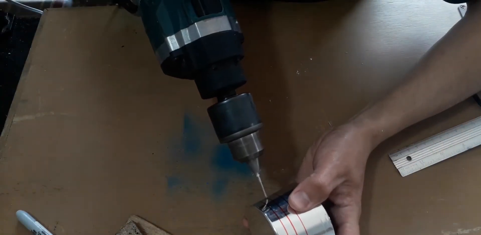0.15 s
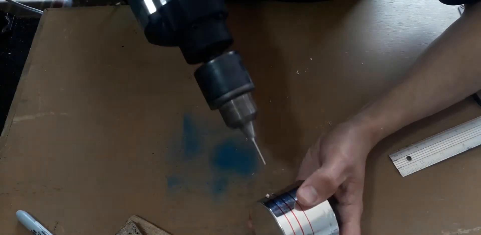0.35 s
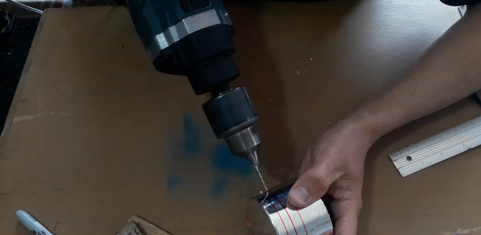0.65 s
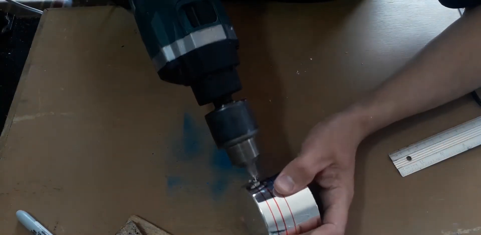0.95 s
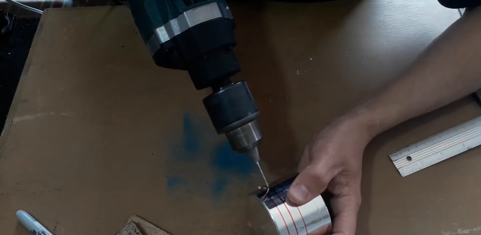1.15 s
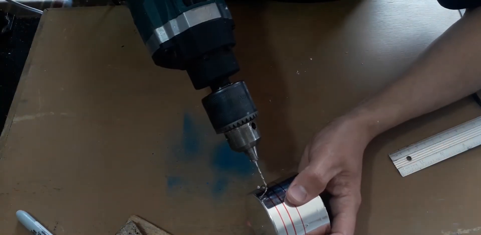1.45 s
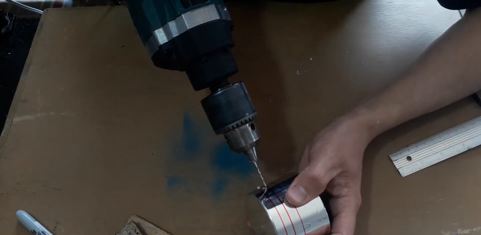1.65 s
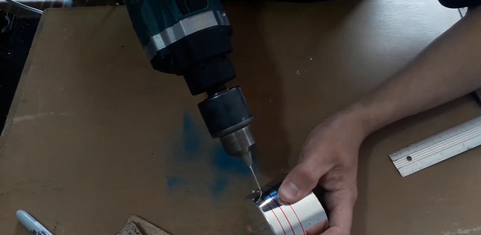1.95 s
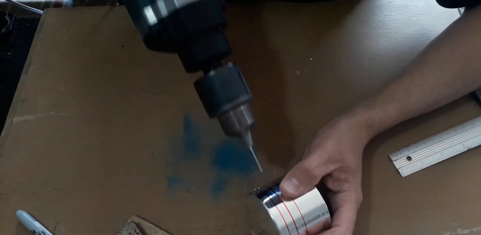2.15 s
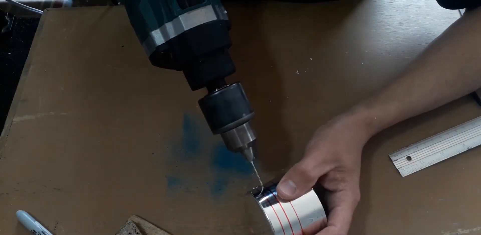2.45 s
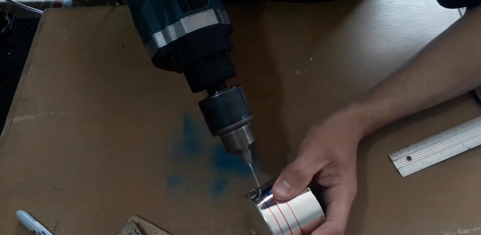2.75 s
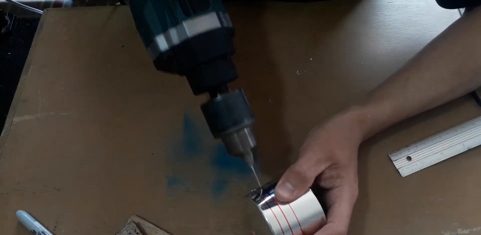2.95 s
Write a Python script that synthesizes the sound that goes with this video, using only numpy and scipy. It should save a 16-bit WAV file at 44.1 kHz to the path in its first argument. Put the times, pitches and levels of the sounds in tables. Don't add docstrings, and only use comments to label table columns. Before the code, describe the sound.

A handheld electric drill, close in a small quiet room, starts already running and winds down from 0.3 to about 0.75 seconds. Short pulls at 0.8 and 1.9 whine up fast with a rough squeal, then coast down for half a second, with faint plastic buzzing near release. Soft clicks at 1.45 and 1.8 and faint rubs fill the pause. A longer, higher burst starts at 2.6 and runs to the end.

```python
import sys
import numpy as np
from scipy import signal
from scipy.fft import rfft, irfft, next_fast_len
from scipy.io import wavfile
from scipy.ndimage import uniform_filter1d, map_coordinates

SR = 44100
rng = np.random.default_rng(int(sys.argv[2]) if len(sys.argv) > 2 else 0)


def to_wav(sig):
    pcm = np.clip(np.atleast_2d(sig), -1, 1) * 32767
    pcm = np.round(pcm).astype(np.int16)
    wavfile.write(sys.argv[1], SR, pcm.T)


def undo_db(level):
    steps = np.asarray(level, float) / 20
    return 10 ** steps


N = 136710

# (press [s], release [s], top gear mesh rate [Hz], spin-up time [s])
BURSTS = [
    (-.110, 0.297, 1646, .130),
    (0.825, .978, 1703, .066),
    (1.926, 2.108, 1939, .069),
    (2.612, 3.003, 2076, 0.096),
]
# (time [s], level [dB])
EFFORT = [
    [(0.0, -33.5), (0.224, -28.5), (0.3, -28.5), (0.334, -32), (0.61, -41.5), (0.706, -50), (0.736, -61),
     (0.794, -106.5), (0.8, -71.5)],
    [(0.801, -62), (0.811, -36), (0.839, -32), (0.893, -28.5), (0.975, -25.5), (1.009, -31.5), (1.345, -44),
     (1.453, -67.5), (1.47, -105)],
    [(1.921, -57), (1.929, -34), (1.951, -30.5), (1.985, -28.5), (2.097, -25.5), (2.137, -30.5),
     (2.443, -39), (2.571, -51.5), (2.615, -62)],
    [(2.616, -55), (2.628, -34), (2.656, -30.5), (2.802, -27), (2.95, -27), (2.96, -25), (3.1, -31.5)],
]
# (frequency [Hz], level [dB])
FAST_HISS = [(59, -87.5), (100, -45.5), (185, -27.5), (1030, -18), (1300, -10.5), (1540, -15), (3920, -0.5),
             (12100, -4), (15900, 0)]
# (frequency [Hz], level [dB])
SLOW_HISS = [(59, -68.5), (100, -54.5), (988, -17.5), (1360, -18), (1910, -6.5), (2620, -5.5), (3240, -12),
             (9760, -2), (15900, -8)]
# (frequency [Hz], level [dB])
START_HISS = [(59, -77), (100, -46.5), (581, -18), (1030, -32.5), (1220, -14), (3040, 1), (4650, -19),
              (10200, -10.5), (15900, -17.5)]
# (frequency [Hz], width [Hz], level [dB])
SHELL = [(1320, 90, -3), (2610, 160, -1), (5850, 200, -3), (6840, 200, -1), (9500, 300, -1),
         (11400, 200, -1), (12000, 150, -3), (13000, 200, -3), (13700, 200, -1)]
ORDERS = [.104, .2, .68, 1, 1.5, 2, 2.55, 3, 4, 4.55, 5, 5.1, 6, 6.55, 7.05, 7.62, 8]
# (level [dB], growth exponent with speed)
WHINE = [(-29, 3.2), (-36, 2.5), (-30.5, 2), (-3, 3.3), (-23.5, 2.8), (-8.5, 2.2), (-8, 0.19), (-8, 1.8),
         (-7, 2.2), (-13.5, 1.7), (-16.5, 1.1), (-10, 1.8), (-27, 1.5), (-18.5, .9), (-10, 0.65),
         (-5.5, 2.1), (-1, 1.1)]
# (frequency [Hz], width [Hz], level [dB])
HOUSING = [(1500, 140, 0), (1958, 53, 7), (2367, 320, 12), (2980, 67, 8.5), (4057, 250, 5),
           (5260, 1500, 0.5)]
SQUEAL_DB = [-23, -18.5, -18, -19.5]
# (time [s], level [dB])
CATCHES = [(.005, -29), (.23, -34), (0.326, -50), (.922, -33), (0.946, -31.5), (0.966, -53), (0.989, -32.5),
           (1.03, -54), (2.046, -29), (2.065, -46), (2.115, -34), (2.269, -51), (2.97, -59)]
# (time [s], length [s], frequency [Hz])
CHATTER = [
    (1.003, .016, 490),
    (2.088, .028, 500),
    (2.05, .016, 600),
]
CHATTER_DB = [-40.5, -47, -46]
# (time [s], peak [dB], rattle [dB])
CLICKS = [
    (1.4476, -45, -33),
    (1.8045, -35, -16),
]
# (frequency [Hz], level [dB], T60 [s])
SWITCH = [(1353, -7, 0.057), (2516, -13, 0.039), (3400, -17.5, .03), (9700, -15, 0.026),
          (11900, -21, 0.026), (13420, -30, 0.025)]
# (time [s], length [s], frequency [Hz], level [dB])
RUBS = [(1.507, 0.046, 3400, -65.5), (1.568, 0.024, 2340, -67), (1.605, .05, 1840, -67),
        (1.624, 0.045, 2690, -68), (1.68, .04, 2400, -76), (1.869, .06, 2550, -70),
        (1.891, 0.017, 3400, -64), (0.735, 0.041, 1360, -60.5)]
# (frequency [Hz], level [dB])
FLOOR = [(40, -16.5), (200, -6.5), (400, -5.5), (600, 5.5), (900, -1), (2600, -7), (5500, -23.5),
         (12000, -28.5), (15900, -54.5)]

COAST_S, FRICTION_HZ = 0.47, 1202.5
FAST_DB, SLOW_DB, START_DB = 5, 3, -7
MIX_HZ, LOAD_S = 1094, 0.088
GRIT_DB, PATCH_DB = 2, 1.58
WHINE_DB, FLUTTER_DB, FLUTTER_RATE_HZ, SMEAR = -31, 2.2, 50, .0008
MESH_HZ = 780
SQUEAL_ORDER, SQUEAL_AT_HZ, SQUEAL_SPAN_HZ = 11.3, 1024, 102
SQUEAL_WIDTH, SQUEAL_BEAT_HZ = .05, 572
CATCH_S = 0.00046
RUB_WIDTH_HZ, RUB_SCRAPE_DB = 68, -4
ROOM_T60_S, ROOM_DB = 0.17, -7.5
FLOOR_DB, SIDE_DB = -67.5, -28.5
LOW_HZ, TOP_HZ = 192, 15850


def unit(x):
    return x / np.sqrt(np.mean(x ** 2) + 1e-20)


def filtered(x, response):
    m = next_fast_len(N + SR // 2)
    return irfft(rfft(x, m) * response(np.fft.rfftfreq(m, 1 / SR)), m)[..., :N]


def noise(points):
    f, db = np.transpose(points)
    colour = lambda hz: undo_db(np.interp(np.log(hz + 1), np.log(f + 1), db))
    return unit(filtered(rng.standard_normal(N), colour))


def wobble(rate_hz):
    return map_coordinates(rng.standard_normal(SR), [np.arange(N) * rate_hz / SR])


def peak(f, hz, width_hz):
    return 1j * f * width_hz / (hz * hz - f * f + 1j * f * width_hz)


def resonant(x, modes):
    return filtered(x, lambda f: 1 + sum(undo_db(db) * peak(f, hz, width) for hz, width, db in modes))


def motor(t):
    rows = []
    for press, release, top_hz, climb_s in BURSTS:
        powered_s = np.clip(np.minimum(t, release) - press, 0, None)
        up = top_hz * (1 - np.exp(-powered_s / climb_s))
        drag = np.exp(-np.clip(t - release, 0, None) / COAST_S)
        rows.append(np.maximum((up + FRICTION_HZ) * drag - FRICTION_HZ, 0))
    load = 0
    for effort in EFFORT[1:]:
        start = effort[0][0]
        load = load + np.exp(-np.clip(t - start, 0, None) / LOAD_S) * (t >= start)
    return np.array(rows), np.clip(load, 0, 1)


def hiss(speed, load, t):
    gain = sum(undo_db(np.interp(t, *np.transpose(row), left=-150, right=-150)) for row in EFFORT)
    fast = speed ** 2 / (speed ** 2 + MIX_HZ ** 2)
    x = np.sqrt((1 - load) * fast) * undo_db(FAST_DB) * noise(FAST_HISS)
    x = x + np.sqrt((1 - load) * (1 - fast)) * undo_db(SLOW_DB) * noise(SLOW_HISS)
    x = x + np.sqrt(load) * undo_db(START_DB) * noise(START_HISS)
    z = signal.stft(x, nperseg=256)[2]
    field = uniform_filter1d(uniform_filter1d(rng.standard_normal(z.shape), 4, 0), 4, 1)
    patches = unit(undo_db(PATCH_DB * unit(field)))
    x = signal.istft(z * patches, nperseg=256)[1][:N]
    x = x * unit(undo_db(GRIT_DB * wobble(1600)))
    return gain * resonant(x, SHELL)


def whine(speed):
    x = 0
    bite = speed ** 10 / (speed ** 10 + MESH_HZ ** 10)
    for order, (db, growth) in zip(ORDERS, WHINE):
        phase = 2 * np.pi * np.cumsum(order * speed * (1 + SMEAR * wobble(150))) / SR
        level = undo_db(db + FLUTTER_DB * wobble(FLUTTER_RATE_HZ)) * (speed / 1800) ** growth
        if order > 1.2:
            level = level * bite
        x = x + level * np.sin(phase)
    return undo_db(WHINE_DB) * resonant(x, HOUSING)


def squeal(rows, t):
    x = 0
    for speed, burst, db in zip(rows, BURSTS, SQUEAL_DB):
        gate = np.exp(-((speed - SQUEAL_AT_HZ) / SQUEAL_SPAN_HZ) ** 2 / 2) * (t < burst[1])
        phase = 2 * np.pi * np.cumsum(SQUEAL_ORDER * speed * (1 + SQUEAL_WIDTH * wobble(900))) / SR
        beat = 1 + 1.3 * np.sin(2 * np.pi * SQUEAL_BEAT_HZ * t + 4.5 * wobble(160))
        x = x + undo_db(db + 1.8 * wobble(500)) * gate * beat * np.sin(phase)
    return x


def bit_catches(t):
    x = 0
    for start, db in CATCHES:
        u = np.clip(t - start, 0, None) / CATCH_S
        x = x + undo_db(db) * u * (2 - u) * np.exp(-u)
    return x


def plastic_chatter(t):
    x = 0
    for (start, length, hz), db in zip(CHATTER, CHATTER_DB):
        gate = np.clip(np.minimum(t - start, start + length - t) / .003, 0, 1)
        turn = 2 * np.pi * hz * t
        buzz = np.sin(turn) + 0.95 * np.sin(2 * turn) + .4 * np.sin(3 * turn)
        x = x + undo_db(db) * gate * buzz
    return x


def trigger_clicks():
    x = np.zeros(N + SR)
    u = np.arange(SR // 4) / SR
    for start, db, rattle_db in CLICKS:
        ring = sum(undo_db(level - 60 * u / t60) * np.sin(2 * np.pi * hz * u) for hz, level, t60 in SWITCH)
        decay = undo_db(-60 * u / 0.0026) + undo_db(rattle_db - 60 * u / 0.083)
        crack = decay * rng.standard_normal(len(u))
        x[round(start * SR):][:len(u)] += undo_db(db) * (ring + crack)
    return x[:N]


def finger_rubs(t):
    x = 0
    for start, length, hz, db in RUBS:
        gate = np.sin(np.pi * np.clip((t - start) / length, 0, 1) ** .6)
        tone = unit(filtered(rng.standard_normal(N), lambda f: peak(f, hz, RUB_WIDTH_HZ)))
        scrape = unit(filtered(rng.standard_normal(N), lambda f: peak(f, 3000, 1600) ** 2))
        x = x + undo_db(db) * gate * (tone + undo_db(RUB_SCRAPE_DB) * scrape)
    return x


def room(near):
    u = np.arange(SR // 4) / SR
    tail = rng.standard_normal(len(u)) * undo_db(-60 * u / ROOM_T60_S) * (u > .004)
    return undo_db(ROOM_DB) * signal.fftconvolve(near, tail / np.linalg.norm(tail))[:N]


def scene():
    t = np.arange(N) / SR
    rows, load = motor(t)
    speed = rows.max(axis=0)
    drill = hiss(speed, load, t) + whine(speed) + squeal(rows, t)
    near = drill + bit_catches(t) + plastic_chatter(t) + trigger_clicks() + finger_rubs(t)
    mid = near + room(near) + undo_db(FLOOR_DB) * noise(FLOOR)
    side = undo_db(FLOOR_DB + SIDE_DB) * noise(FLOOR)
    return np.array([mid + side, mid - side])


def low_pass(x):
    return signal.sosfilt(signal.butter(12, 16600, fs=SR, output="sos"), x)


def record(dry):
    def microphone(f):
        bass_cut = (1j * f / (LOW_HZ + 1j * f)) ** 2
        return bass_cut * np.clip((TOP_HZ - f) / 200 + 1, 0, 1) ** 2

    return low_pass(filtered(dry, microphone))


dry = scene()
out = record(dry)
to_wav(out)
```